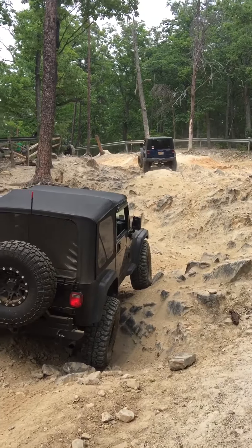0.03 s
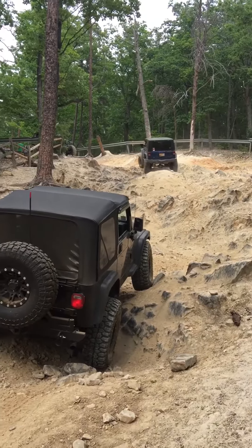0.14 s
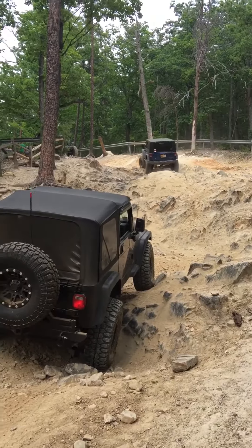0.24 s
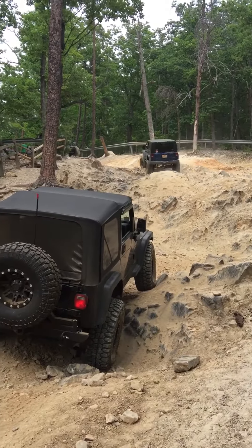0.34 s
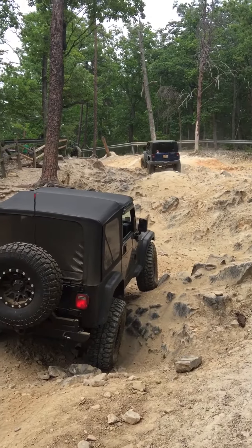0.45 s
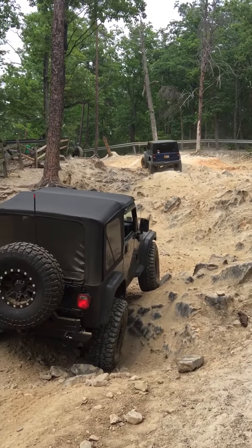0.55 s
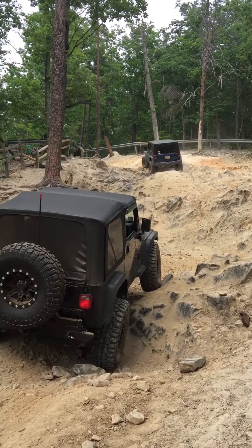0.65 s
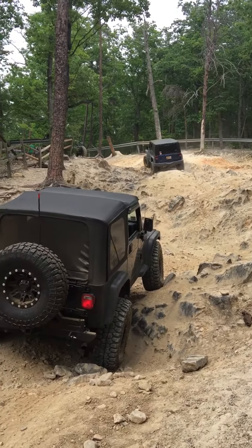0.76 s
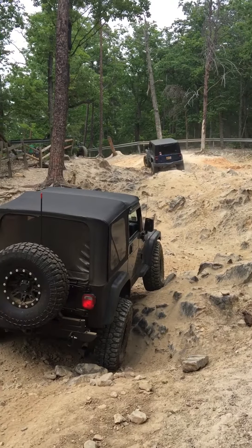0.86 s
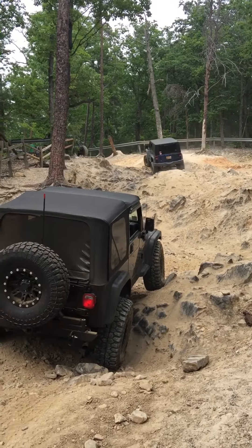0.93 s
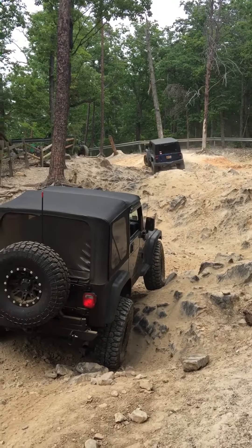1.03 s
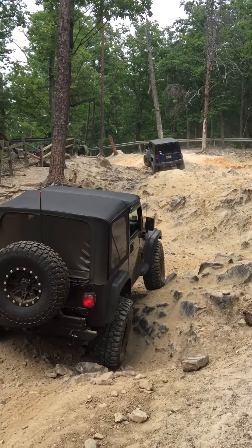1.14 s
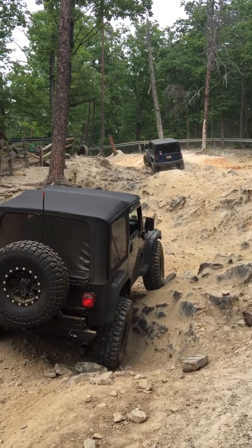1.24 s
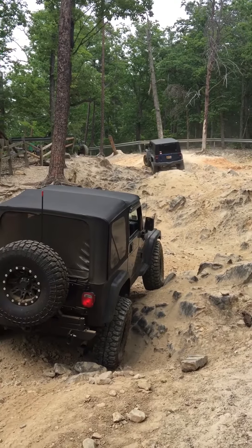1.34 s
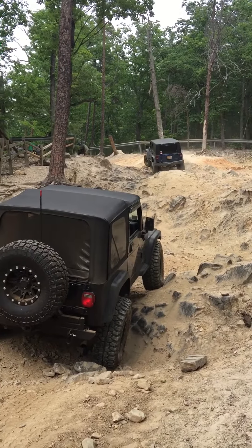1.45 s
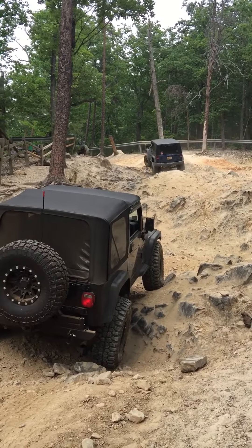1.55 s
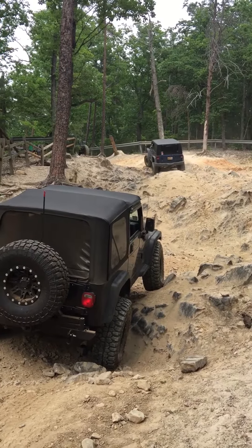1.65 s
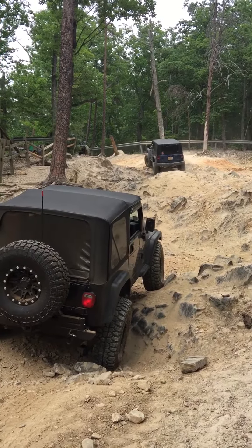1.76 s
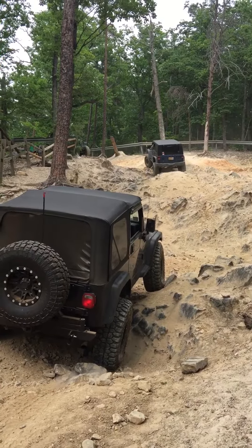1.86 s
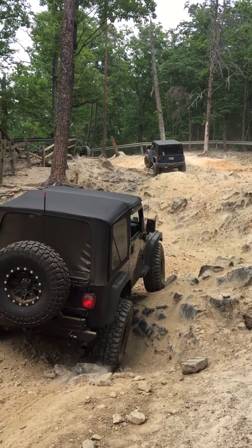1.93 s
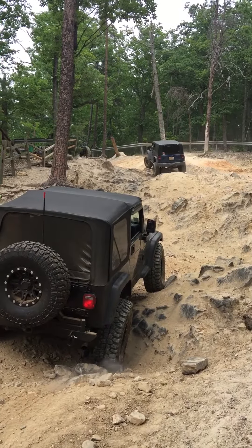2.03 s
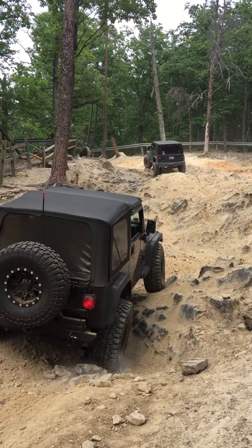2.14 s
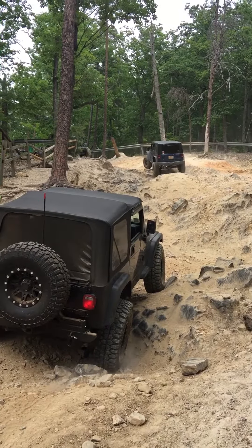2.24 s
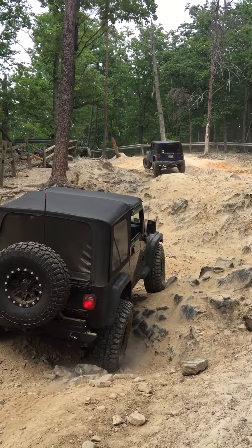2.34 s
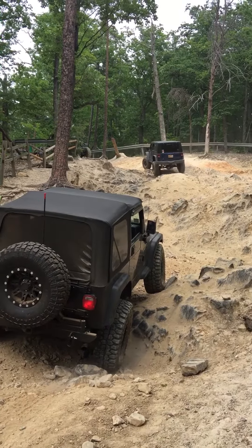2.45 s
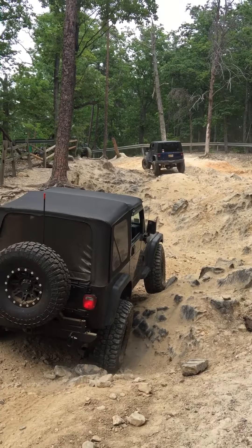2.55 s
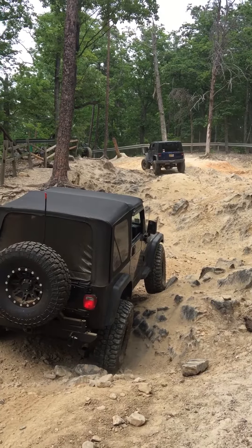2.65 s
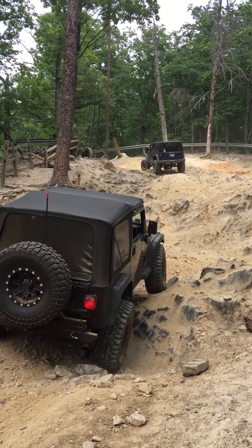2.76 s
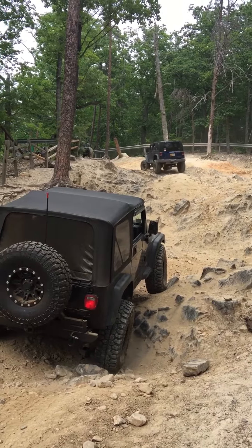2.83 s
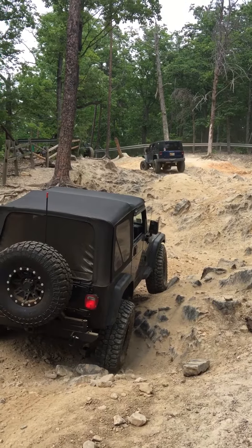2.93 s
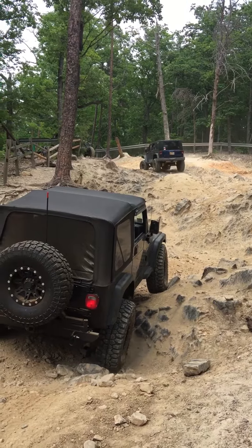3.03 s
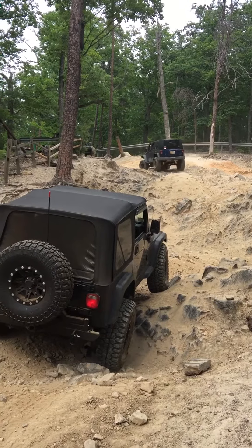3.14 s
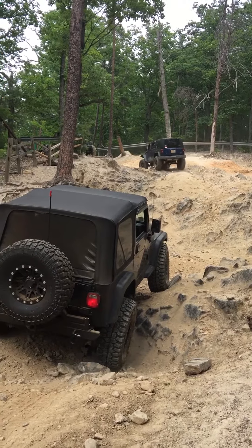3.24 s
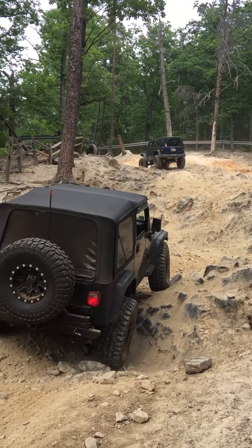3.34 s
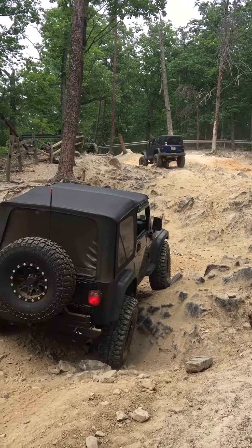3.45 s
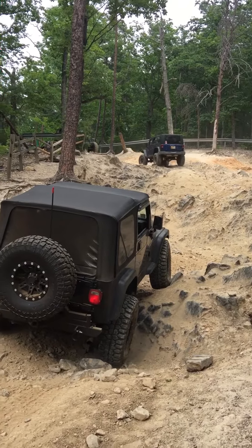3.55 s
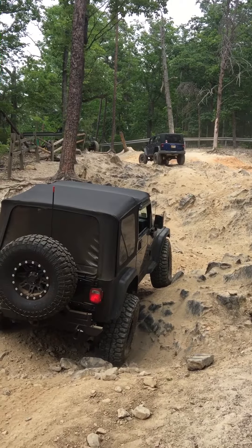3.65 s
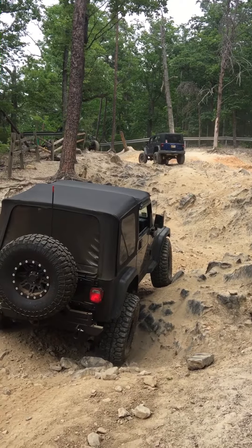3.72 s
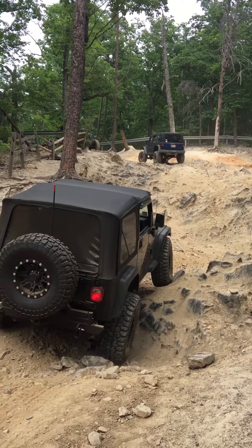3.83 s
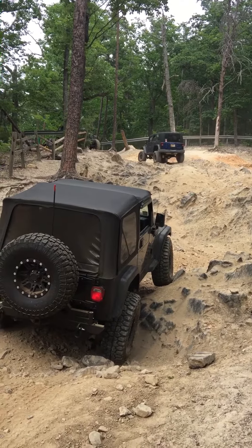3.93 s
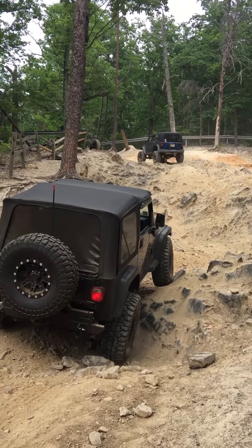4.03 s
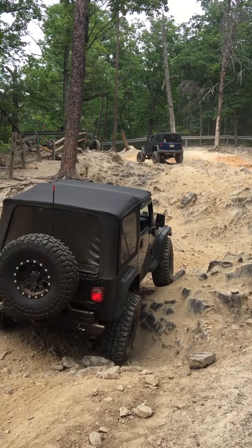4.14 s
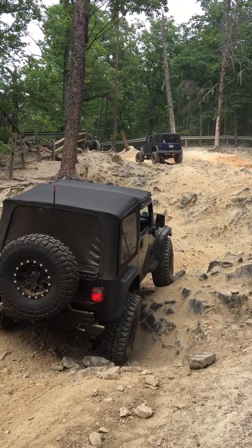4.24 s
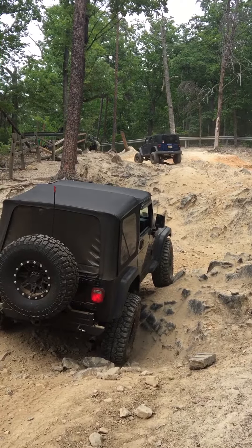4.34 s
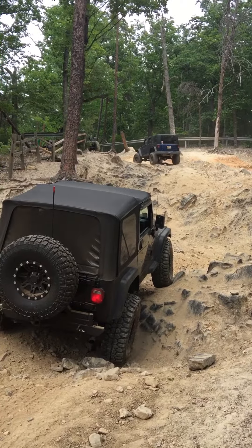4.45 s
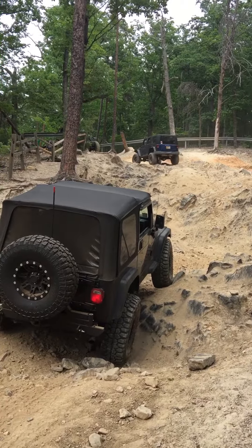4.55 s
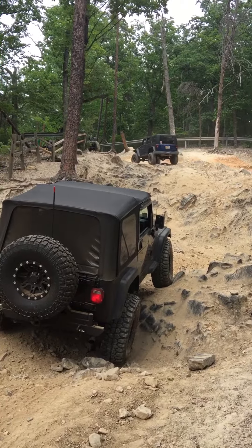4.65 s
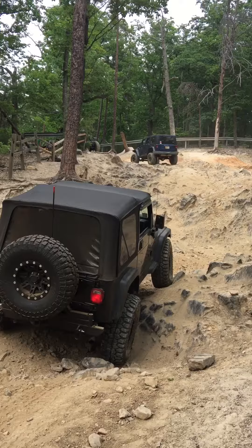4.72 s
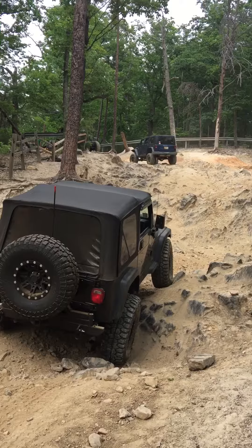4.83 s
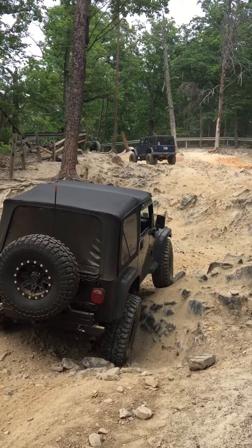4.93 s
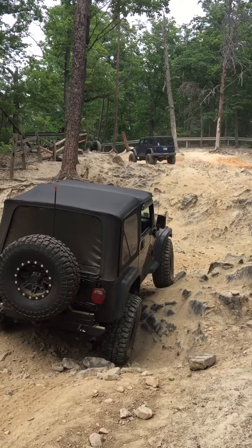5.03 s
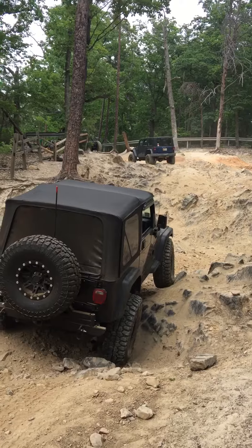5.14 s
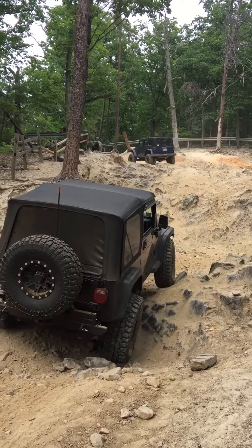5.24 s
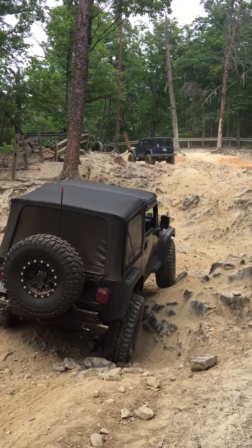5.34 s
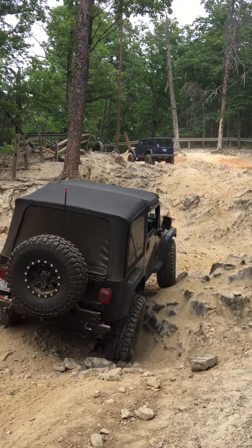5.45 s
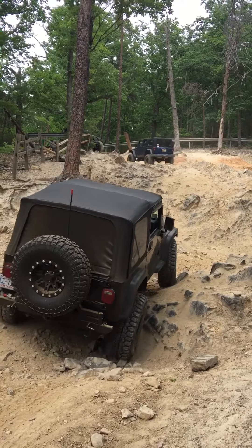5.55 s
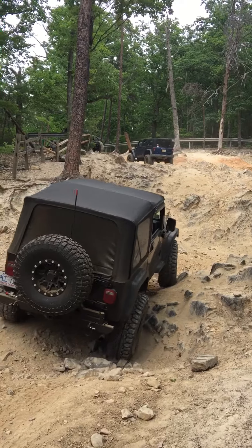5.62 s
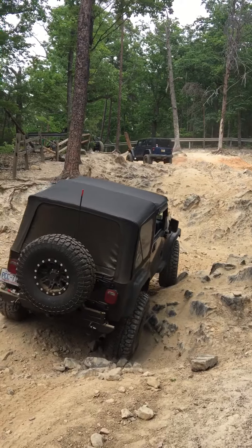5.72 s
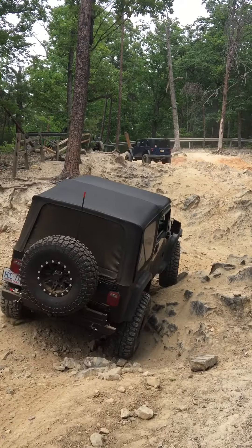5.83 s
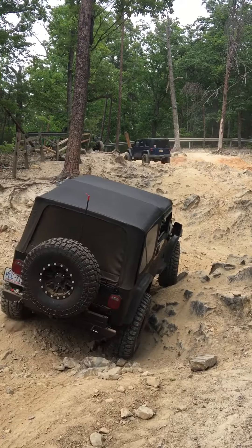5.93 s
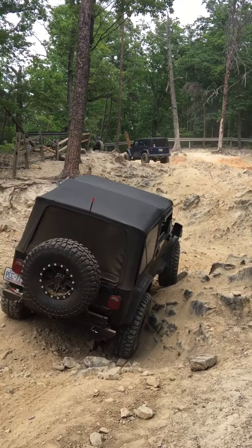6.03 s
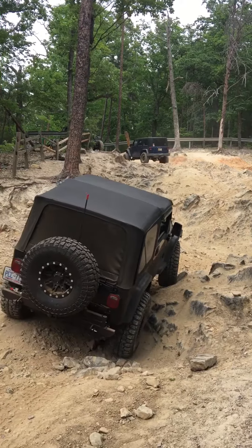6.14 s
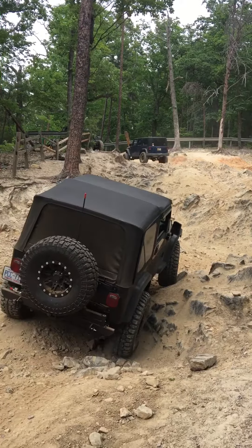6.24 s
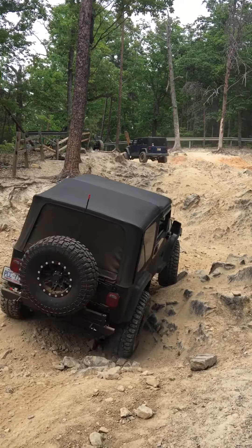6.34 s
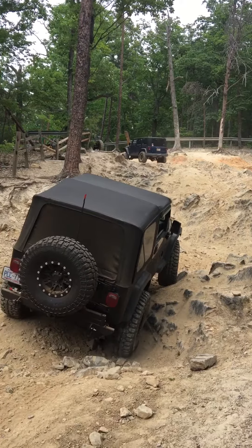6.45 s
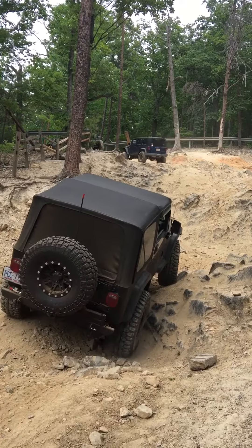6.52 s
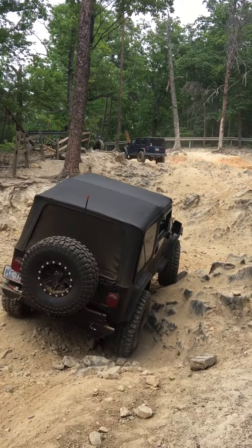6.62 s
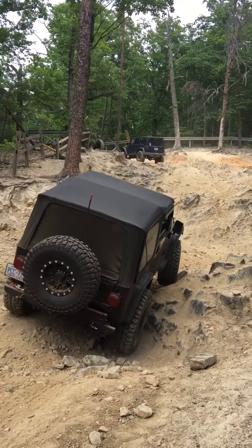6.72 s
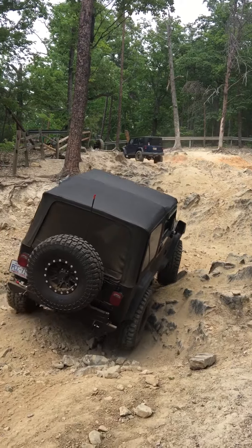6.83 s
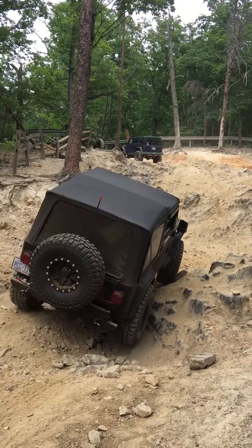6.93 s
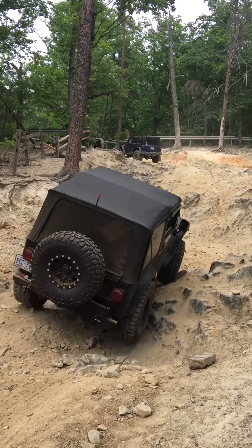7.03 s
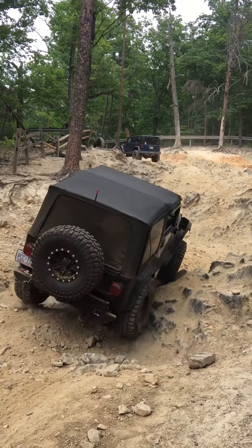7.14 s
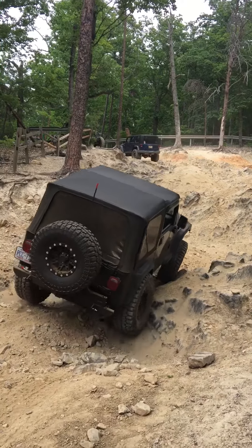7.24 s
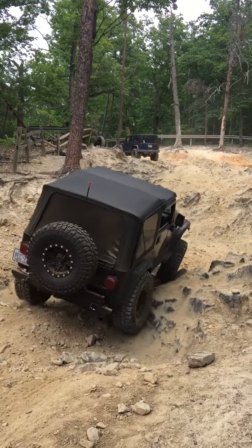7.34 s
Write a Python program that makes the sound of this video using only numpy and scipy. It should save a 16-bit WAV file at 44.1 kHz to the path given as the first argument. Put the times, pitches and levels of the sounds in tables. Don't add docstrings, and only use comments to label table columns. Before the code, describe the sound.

Distant car fades among rustling trees, then a starter clunks and whines, a rough engine catches, revs up over rocks, bangs and bogs down.

```python
import sys
import numpy as np
from scipy import signal
from scipy.fft import rfft, irfft, next_fast_len
from scipy.io import wavfile
from scipy.ndimage import map_coordinates

SR = 44100
rng = np.random.default_rng(int(sys.argv[2]) if len(sys.argv) > 2 else 0)


def volts(x):
    e = np.asarray(x, float) / 20
    return 10 ** e


def store_pcm(level_fs):
    pcm = np.round(np.clip(level_fs, -1, 1) * 32767).astype(np.int16)
    wavfile.write(sys.argv[1], SR, np.atleast_2d(pcm).T)


N = 325458


def unit(x):
    return x / np.sqrt(np.mean(x ** 2) + 1e-20)


def curves(rows, before=None):
    times, *columns = np.transpose(rows)
    return [np.interp(np.arange(N) / SR, times, column, left=before) for column in columns]


def wobble(rate):
    knots = rng.standard_normal(int(N * rate / SR) + 4)
    return map_coordinates(knots, [np.arange(N) * rate / SR])


def filtered(x, response):
    m = next_fast_len(N + SR // 2)
    return irfft(rfft(x, m) * response(np.fft.rfftfreq(m, 1 / SR)), m)[:N]


def resonances(modes):
    def response(f):
        total = 0
        for k, (centre, width, db) in enumerate(modes):
            damping = 1j * f * width
            total = total + (-1) ** k * volts(db) * damping / (centre * centre - f * f + damping)
        return total
    return response


def noise(spectrum, beat=1):
    f, db = np.transpose(spectrum)

    def colour(hz):
        return volts(np.interp(np.log(hz + 1), np.log(f), db, left=-120, right=-120))
    return unit(filtered(beat * rng.standard_normal(N), colour))


def puffs(rate, sizes, scatter, modes):
    count = np.floor(np.cumsum(rate) / SR).astype(int)
    at = np.flatnonzero(np.diff(count)) + 1
    chance = scatter * rng.standard_normal(N // 200)[:len(at)]
    train = np.zeros(N)
    train[at] = np.take(sizes, count[at], mode="wrap") + chance
    pipe = resonances(modes)
    return unit(filtered(train, lambda f: pipe(f) / (1 + 1j * f / 260) ** 2))


def far_car():
    # t/s, level/dB, firing rate/Hz
    departure = [(0.0, -40, 84), (0.348, -44, 84), (0.388, -54, 84), (0.486, -46, 84), (0.51, -65, 84),
                 (0.588, -46.5, 84), (0.668, -57, 84), (0.674, -63, 84), (1.02, -61, 84), (1.054, -47, 84),
                 (1.086, -64, 84), (1.242, -65, 84), (1.25, -52, 84)]
    # f/Hz, width/Hz, level/dB
    far_pipe = [(84, 30, -0.5), (165, 53, -5), (250, 34, -23.5)]
    level_db, rate = curves(departure + [(1.4, -79, 84)])
    return volts(level_db) * puffs(rate, [1], 0.5, far_pipe)


def woods():
    # t/s, leaves and far tyres level/dB, wind on the microphone level/dB
    air = [(0.0, -53.5, -56), (0.302, -54.5, -62), (0.34, -53, -49), (0.518, -55, -58), (0.574, -50, -52),
           (0.646, -58, -78), (0.734, -57.5, -58), (0.792, -56, -78), (0.876, -56.5, -56),
           (0.922, -60, -79), (1.25, -61, -72)]
    # f/Hz, level/dB per Hz
    rustle = [(120, -39), (200, -5.5), (393, -16.5), (567, -6.5), (706, -9), (863, -15.5), (1060, -23),
              (1440, -18), (1760, -21.5), (2490, -24), (3460, -28.5), (4240, -29.5), (15800, -44.5)]
    leaves_db, wind_db = curves(air)
    leaves = noise(rustle, volts(2.6 * wobble(30)))
    wind = noise([(18, -10.5), (35, -7), (60, 0), (130, -14)])
    return volts(leaves_db) * leaves + volts(wind_db) * wind


def strikes(rows, spread):
    out, t = np.zeros(N + SR), np.arange(SR // 4) / SR
    for start, db, hz, t60, crack_db in rows:
        detune = rng.standard_normal((4, 1)) * [[0], [.6], [.6], [1.2]]
        modes = hz * np.exp(spread * detune)
        ring = np.sin(2 * np.pi * modes * t).T @ [0.48, 0.29, 0.28, 0.13]
        smoothing = np.hanning(int(SR / hz / 1.43) + 3)
        crack = unit(np.convolve(rng.standard_normal(len(t)), smoothing, "same"))
        decay = volts(db - 60 * t / max(t60, .005))
        onset = 1 - np.exp(-t / 0.0011)
        out[round(start * SR):][:len(t)] += decay * onset * (ring + volts(crack_db) * crack)
    return out[:N]


def stones_and_body():
    # t/s, peak level/dB, ring f/Hz, t60/s, crack level/dB
    body_knocks = [(0.033, -39.5, 750, 0.08, -8), (0.355, -41, 594, 0.11, -11),
                   (0.459, -45.5, 680, 0.085, 2), (0.674, -37, 609, 0.062, -5),
                   (0.752, -37, 678, 0.091, -2), (0.788, -44, 401, 0.057, -3),
                   (0.837, -41.5, 654, 0.08, -2), (1.016, -49, 667, 0.08, -9),
                   (1.038, -40, 495, 0.064, -14), (1.106, -43, 883, 0.077, -3),
                   (1.262, -33, 616, 0.073, -14), (1.291, -18.5, 613, 0.09, -14),
                   (3.58, -40, 437.5, 0.069, -1), (4.647, -30, 655, 0.07, -16),
                   (4.732, -42, 583.7, 0.077, -10), (5.582, -37, 460, 0.064, -2),
                   (5.806, -27, 619.6, 0.076, -10), (5.946, -26.5, 490, 0.08, -5),
                   (7.102, -27.5, 398, 0.082, 0), (7.139, -30, 610, 0.091, -9),
                   (7.175, -24.5, 498, 0.072, -4), (7.196, -34.5, 560, 0.071, -8),
                   (7.294, -34, 579, 0.08, 0)]
    # t/s, peak level/dB, ring f/Hz, t60/s, crack level/dB
    stone_clicks = [(0.236, -51, 1630, 0.07, -6), (0.2783, -54.5, 2720, 0.066, 0),
                    (0.3611, -49, 1680, 0.063, -10), (0.5038, -42, 1916, 0.067, -2.5),
                    (0.5694, -50.5, 2070, 0.15, 1), (0.856, -46, 1600, 0.059, 0),
                    (1.261, -18, 4550, 0.039, -4), (1.2928, -20, 2240, 0.061, -17),
                    (2.0494, -32.5, 1880, 0.061, -1), (2.0847, -31, 1720, 0.061, -5),
                    (2.1066, -24.5, 1780, 0.07, -13), (2.3495, -30, 4033, 0.07, -4),
                    (3.5793, -32.5, 2665, 0.093, -18), (3.6243, -35.5, 2650, 0.075, -9),
                    (3.6736, -31.5, 2480, 0.061, -16), (5.2405, -42, 1963, 0.061, -13),
                    (5.2869, -38, 1790, 0.049, -8), (5.38, -40.5, 1790, 0.076, -2),
                    (5.859, -32.5, 1730, 0.055, 1), (5.885, -32.5, 2270, 0.08, -3),
                    (5.9538, -33.5, 2850, 0.07, 0.5), (6.9691, -39.5, 1940, 0.061, -5),
                    (7.0283, -35.5, 1570, 0.07, -1.5), (7.0893, -36.5, 2420, 0.084, -7),
                    (7.1446, -30.5, 2140, 0.11, -10), (7.167, -26.5, 2115, 0.075, -5),
                    (7.2194, -32, 2310, 0.1, -9)]
    blows = strikes(body_knocks, spread=0.297) + strikes(stone_clicks, spread=.4)
    t = np.arange(SR // 3) / SR
    scatter = rng.standard_normal(len(t)) * volts(-60 * t / 0.64)
    echo = signal.fftconvolve(blows, scatter / np.linalg.norm(scatter))[:N]
    return blows + volts(-12) * echo


def whine(rows, overtones, rough):
    hz, *levels_db = curves(rows)
    jitter = rough * (wobble(400) + 2 * wobble(120))
    phase = 2 * np.pi * np.cumsum(hz) / SR + jitter
    sound = np.zeros(N)
    for k, db in enumerate(levels_db, 1):
        sound += volts(db + 4.8 * wobble(35.05)) * np.sin(k * phase)
    for multiple, db in overtones:
        sound += volts(levels_db[0] + db + 6.5 * wobble(29.9)) * np.sin(multiple * phase)
    t = np.arange(N) / SR
    edges = np.clip(np.minimum(t - rows[0][0], rows[-1][0] - t) / .01, 0, 1)
    return np.sqrt(2) * sound * edges


def starter():
    # t/s, ring level/dB, shudder level/dB
    housing = [(1.27, -56, -63), (1.312, -40.5, -50), (1.396, -32.5, -37), (1.428, -32, -50),
               (1.464, -42, -42.5), (1.502, -35, -42), (1.52, -39.5, -53), (1.706, -37, -39),
               (1.85, -27.5, -46), (1.894, -33.5, -39), (1.92, -33, -29)]
    # t/s, f/Hz, level/dB
    cranking = [
        (1.33, 1658, -52),
        (1.374, 1863, -35),
        (1.458, 2413, -44.5),
        (1.526, 2480, -39.5),
        (1.602, 1970, -30.5),
        (1.628, 1963, -31.5),
        (1.64, 1980, -43),
    ]
    # t/s, f/Hz, first and second harmonic level/dB
    coasting = [(1.64, 3100, -43, -57), (1.76, 4404, -58, -63), (1.88, 5145, -53, -73),
                (1.98, 5592, -55, -63), (2.14, 6040, -58, -68), (2.16, 6562, -54, -69),
                (2.26, 6697, -62, -77), (2.28, 6382, -54, -65), (2.36, 6601, -57, -69),
                (2.8, 5179, -68, -76), (3.08, 4335, -63, -68), (3.54, 3029, -60, -71),
                (3.62, 2683, -53, -71), (3.7, 2683, -64, -81), (3.72, 2437, -47, -83),
                (3.8, 2268, -55, -73), (4.0, 1667, -67, -69)]
    ring_db, shudder_db = curves(housing + [(1.98, -100, -100)], before=-120)
    housing_mode = resonances([(188, 22, 0)])
    ring = unit(filtered(rng.standard_normal(N), lambda f: housing_mode(f) ** 2))
    shudder = noise([(30, -19), (60, -1.5), (140, -4.5), (170, -14)])
    loaded = whine(cranking, [(.5, -13), (1.5, -10.5), (2, -17)], rough=0.63)
    free = whine(coasting, [], rough=0.41)
    return loaded + free + volts(ring_db) * ring + volts(shudder_db) * shudder


def engine_bay(phase):
    # t/s, block level/dB, clatter level/dB, hiss level/dB
    bay = [(1.27, -48, -31.5, -28.5), (1.28, -52, -31.5, -42), (1.3, -40, -32.5, -40),
           (1.32, -38, -34, -47), (1.37, -35, -37, -45.5), (1.42, -50, -43.5, -48),
           (1.46, -37.5, -37.5, -46), (1.49, -46.5, -39, -41), (1.61, -40.5, -37.5, -47),
           (1.64, -44, -40, -43), (1.8, -59, -44.5, -49), (1.83, -40, -40.5, -45),
           (1.98, -48.5, -44.5, -47.5), (2.14, -42.5, -39.5, -41.5), (2.34, -41.5, -38, -40.5),
           (2.44, -45.5, -46, -50.5), (2.67, -44, -46.5, -53.5), (3.24, -48, -48.5, -55.5),
           (3.52, -44.5, -48, -57), (3.89, -53, -54, -60), (4.54, -48.5, -51.5, -68), (4.62, -58, -52, -69),
           (4.65, -48, -52, -63), (4.72, -46, -50.5, -66), (4.79, -39.5, -48, -63), (4.88, -56, -51, -73),
           (5.03, -49, -53.5, -62.5), (5.15, -53, -53, -69), (5.34, -55, -48.5, -56),
           (5.76, -44.5, -47.5, -55.5), (5.81, -42, -46.5, -52), (5.83, -48, -45, -53.5),
           (5.86, -42, -44.5, -55), (5.92, -36, -42.5, -55), (5.95, -38.5, -39.5, -47.5),
           (6.0, -43, -46.5, -54), (6.54, -42.5, -44, -50), (7.02, -47, -48.5, -54.5),
           (7.11, -42, -46, -52.5), (7.12, -44, -45, -59), (7.17, -34, -42, -64), (7.23, -38.5, -47.5, -53),
           (7.26, -41, -52.5, -68), (7.38, -47, -52.5, -57)]
    # f/Hz, level/dB per Hz
    block_colour = [(140, -32), (230, -3.5), (275, -2.5), (335, -19.5), (378, -10.5), (515, -9.5),
                    (650, -9), (863, -16.5), (1000, -14.5), (1300, -41.5), (2200, -120)]
    # f/Hz, level/dB per Hz
    clatter_colour = [(530, -26), (900, 0), (945, -2), (1170, -3), (1250, 4), (1310, -4), (1460, 2),
                      (1850, -1.5), (2030, -1.5), (2760, -4), (3220, -7), (3330, -9), (4800, -25),
                      (6240, -60), (10600, -120)]
    # f/Hz, level/dB per Hz
    hiss_colour = [(1940, -37.5), (3300, -5), (3810, -7), (4460, -6), (4990, -11), (6570, -3), (7440, -8.5),
                   (8310, -9), (10500, -15), (12200, -15.5), (15100, -25), (15800, -27)]
    # f/Hz, width/Hz, level/dB
    panel_modes = [(611, 29, 1), (996, 17, -5.5), (1169, 25, -6.5), (1295, 60, -4.5), (1450, 28, -9),
                   (1930, 25, -3.5)]

    def throb(depth_db):
        beat_db = depth_db * np.cos(phase) + 0.45 * depth_db * np.cos(phase / 3)
        return volts(beat_db + .9 * wobble(25))

    block_db, clatter_db, hiss_db = curves(bay, before=-120)
    panel_ring = resonances(panel_modes)
    panels = unit(filtered(throb(3.9) * rng.standard_normal(N), lambda f: panel_ring(f) ** 2))
    clatter = noise(clatter_colour, throb(1.72)) + volts(-9.5 + 4.4 * wobble(3.01)) * panels
    block = noise(block_colour, throb(2.3))
    hiss = noise(hiss_colour, throb(1.8))
    return volts(block_db) * block + volts(clatter_db) * clatter + volts(hiss_db) * hiss


def exhaust(rate, phase, orders_db):
    # t/s, higher orders level/dB, uneven cylinders level/dB
    throttle = [(1.86, -80, -80), (1.89, -41, -45), (2.0, -43, -30), (2.1, -36, -29), (2.3, -30.5, -37),
                (2.7, -30, -35), (3.1, -27.5, -33.5), (3.5, -29.5, -35.5), (3.9, -36.5, -36),
                (4.3, -37.5, -33), (5.0, -38, -34), (5.3, -37.5, -36), (5.6, -28.5, -39), (5.9, -26, -36.5),
                (6.2, -25, -36.5), (6.5, -25, -33), (6.9, -27.5, -36), (7.1, -35, -34), (7.2, -36.5, -33),
                (7.38, -38, -33.5)]
    # f/Hz, level/dB
    tailpipe = [(60, -9.5), (110, 2.5), (150, 4.5), (178, -0.5), (205, -16.5), (240, -25), (275, -13),
                (310, -26.5), (400, -29.5), (600, -41)]
    lag = [2.2, 0, -2.9]
    cylinders = [1, -.4, -.6, .75, -.3, -.45]
    # f/Hz, width/Hz, level/dB
    silencer = [(112.4, 30, -3.5), (147.4, 27.7, 1), (183, 34.6, -6.5)]
    upper_db, uneven_db = curves(throttle, before=-120)
    f, colour_db = np.transpose(tailpipe)
    drone = np.zeros(N)
    for k, db in enumerate(orders_db):
        drone += volts(db + 0.45 * wobble(20)) * np.cos((k + 1) * phase + lag[k])
    for k in range(4, 10):
        order_db = upper_db + np.interp(k * rate, f, colour_db)
        drone += volts(order_db + 1.5 * wobble(12)) * np.cos(k * phase - 2.1)
    return np.sqrt(2) * drone + volts(uneven_db) * puffs(rate, cylinders, 0.28, silencer)


def engine():
    # t/s, firing rate/Hz, first, second and third order level/dB
    catching = [
        (1.86, 18.6, -70, -70, -72),
        (1.89, 19.3, -55, -32, -34),
        (1.98, 22.2, -55, -37, -39),
        (2.04, 27.6, -50, -32, -31),
        (2.1, 35, -42, -28, -33),
        (2.15, 40.3, -36, -29.5, -28),
    ]
    running = [(2.2, 46.0, -30, -27, -31), (2.31, 48.1, -29, -24, -25), (2.53, 50.5, -32, -26, -23),
               (2.7, 52.8, -32, -23, -34), (2.78, 53.8, -32, -22, -33), (3.1, 56.5, -32, -22, -30),
               (3.22, 55.0, -31, -21, -31), (3.65, 49.2, -35, -26, -24), (3.92, 46.1, -36, -32, -28),
               (4.13, 44.2, -38, -33, -29), (4.29, 43.5, -40, -35, -30), (4.75, 44.3, -40, -33, -29),
               (5.01, 44.2, -39, -32, -29), (5.04, 44.3, -35, -32, -29), (5.2, 41.0, -45, -37, -30),
               (5.29, 42.0, -38, -34, -29), (5.45, 46.8, -30, -27, -29), (5.58, 51.1, -28, -22, -27),
               (5.7, 55.5, -25, -19, -35), (5.84, 60.8, -24, -19, -30), (6.02, 68.7, -26, -19, -43),
               (6.07, 72.3, -23, -18, -54), (6.14, 75.0, -27, -15, -46), (6.28, 80.5, -29, -17, -47),
               (6.32, 81.6, -28, -24, -47), (6.36, 81.8, -28, -24, -54), (6.5, 83.3, -26, -23, -48),
               (6.6, 81.2, -27, -22, -51), (6.71, 78.6, -29, -17, -49), (6.8, 74.9, -28, -14, -43),
               (6.83, 74.0, -28, -14, -50), (6.93, 69.5, -28, -20, -50), (7.0, 67.4, -28, -21, -44),
               (7.02, 65.1, -31, -21, -46), (7.05, 62.6, -32, -24, -36), (7.15, 51.6, -35, -26, -32)]
    bogging = [
        (7.199, 45.56, -43, -37, -29),
        (7.27, 38.75, -48, -42, -33),
        (7.38, 32, -44, -41, -38),
    ]
    # t/s, f/Hz, level/dB
    belt = [
        (7.3, 7040, -68),
        (7.34, 6870, -67),
        (7.38, 6550, -58),
    ]
    rate, *orders_db = curves(catching + running + bogging)
    phase = 2 * np.pi * np.cumsum(rate) / SR
    return exhaust(rate, phase, orders_db) + engine_bay(phase) + whine(belt, [], rough=.8)


def scene():
    mix = far_car() + woods() + stones_and_body() + starter() + engine()
    return mix[None]


def low_pass(x):
    return signal.sosfilt(signal.butter(12, 16440, fs=SR, output="sos"), x)


def record(dry):
    return low_pass(dry)


dry = scene()
out = record(dry)
store_pcm(out)
```